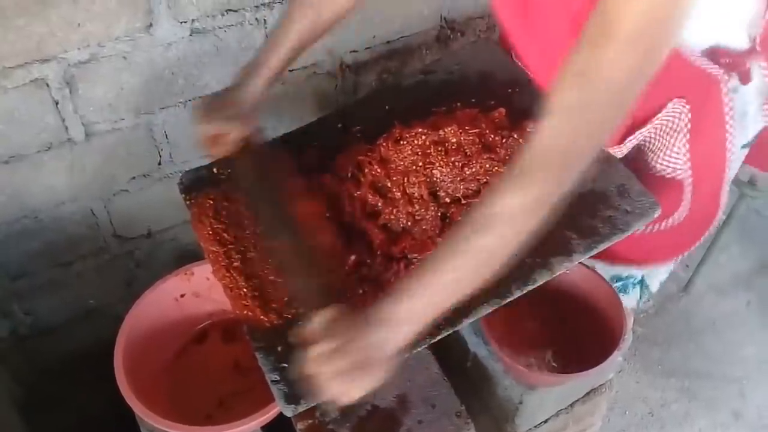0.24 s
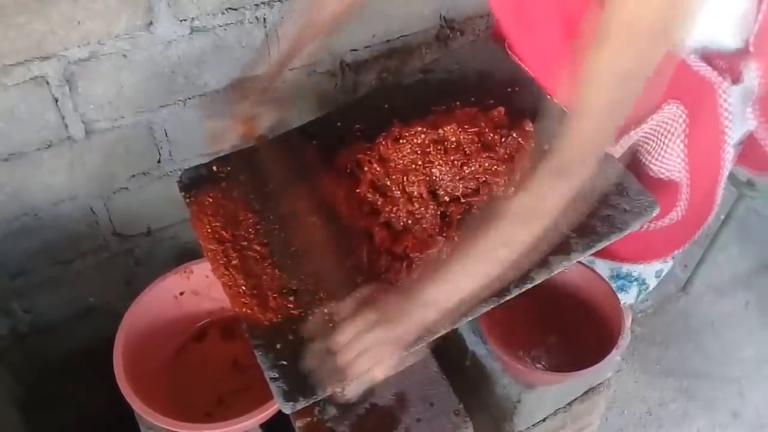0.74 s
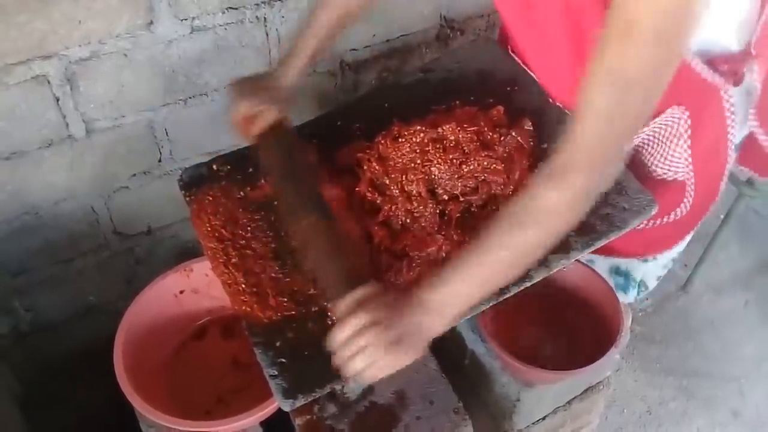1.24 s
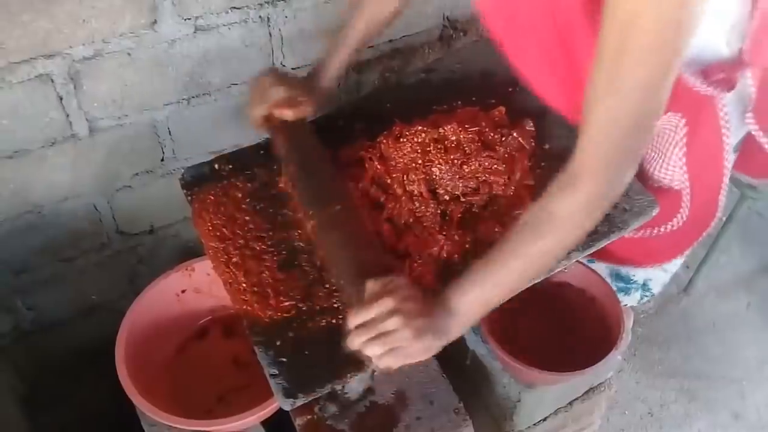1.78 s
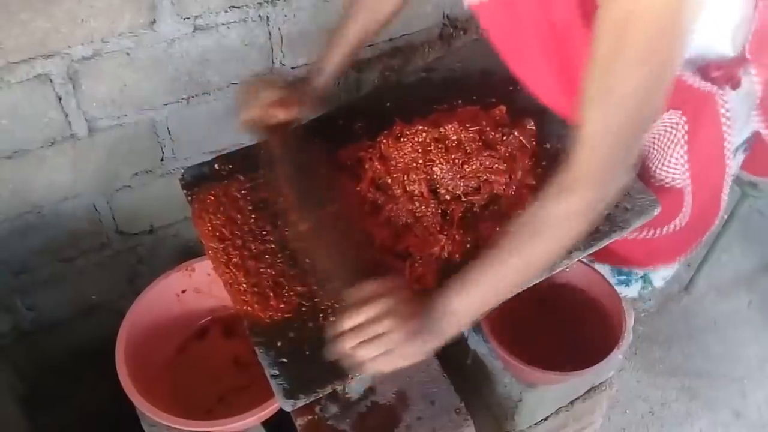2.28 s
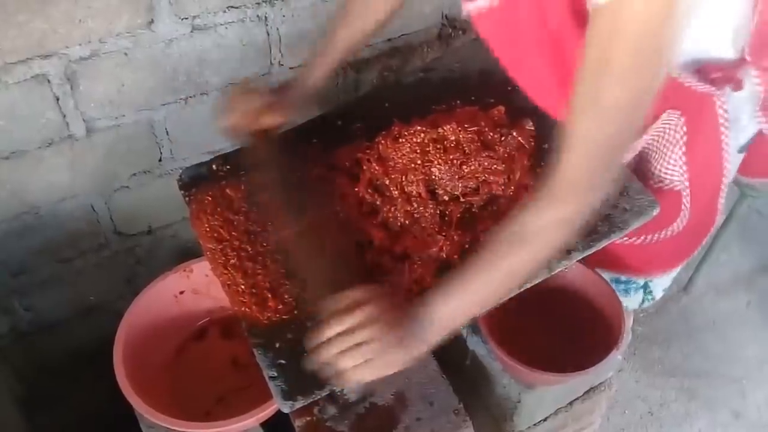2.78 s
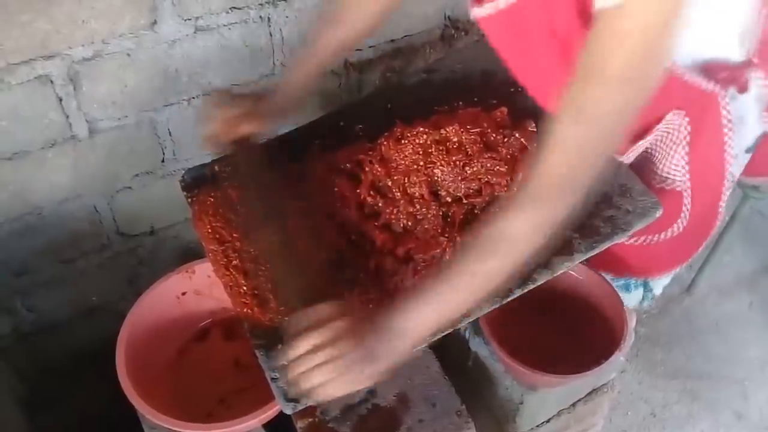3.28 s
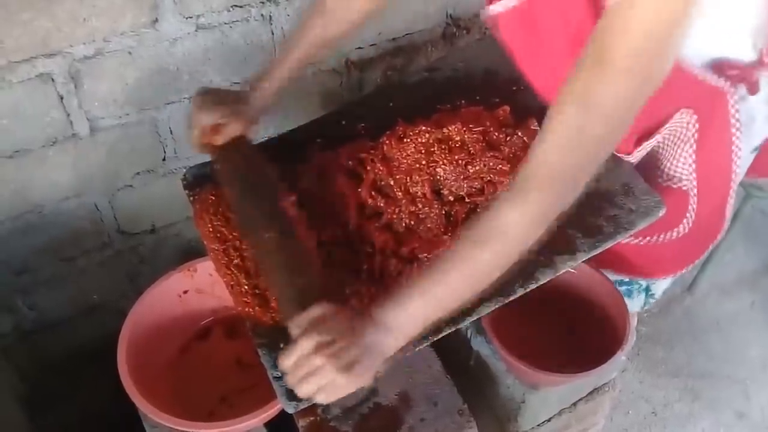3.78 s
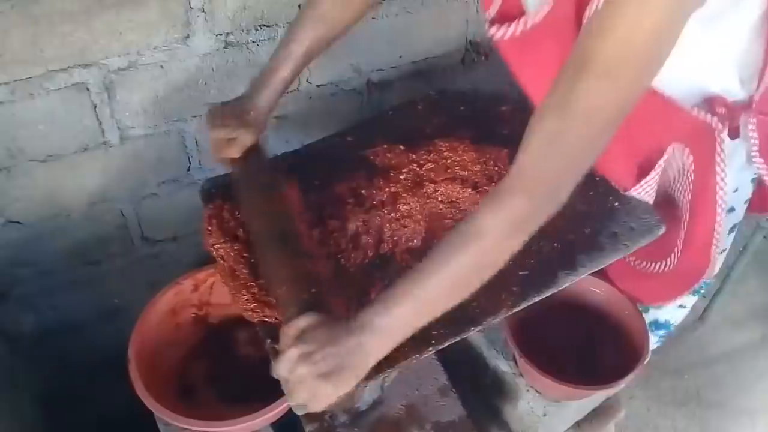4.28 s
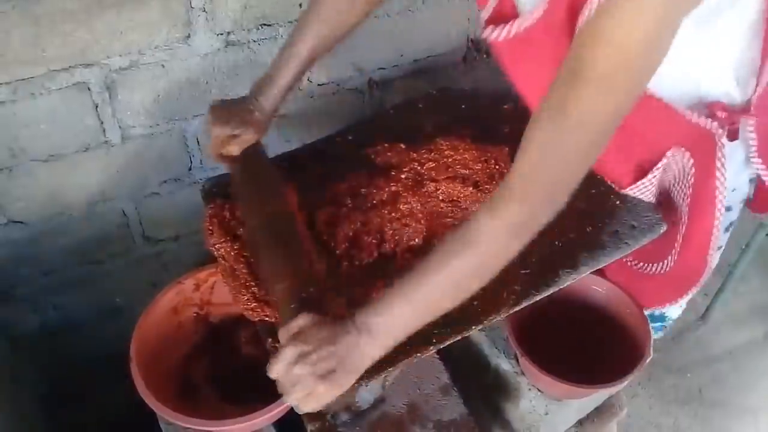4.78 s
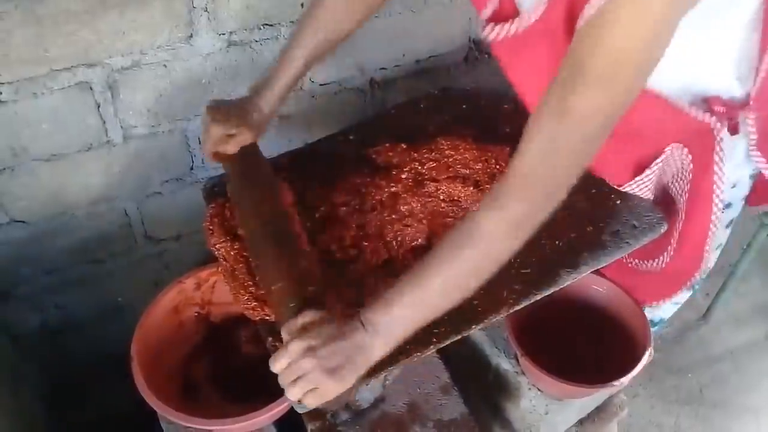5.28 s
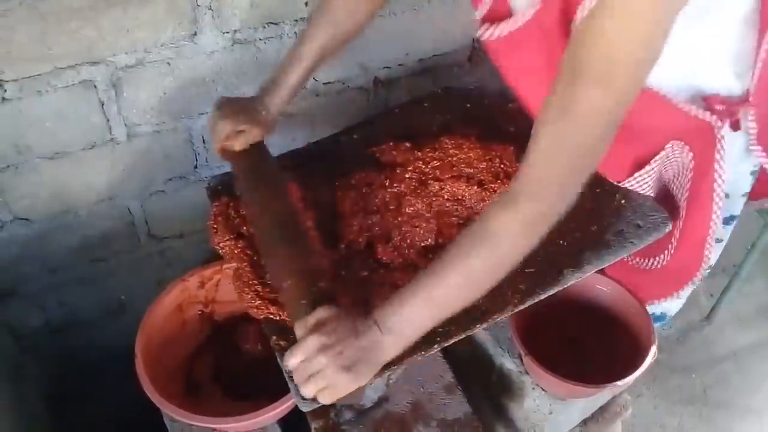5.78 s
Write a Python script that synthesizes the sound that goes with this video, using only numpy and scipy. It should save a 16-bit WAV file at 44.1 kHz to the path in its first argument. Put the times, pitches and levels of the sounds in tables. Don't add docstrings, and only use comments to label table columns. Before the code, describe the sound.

A stone roller scrapes quickly back and forth over a slab of wet chile paste, gritty and crunching, with low knocks and a distant engine hum.

```python
import sys
import numpy as np
from scipy import signal
from scipy.io import wavfile

SR = 44100
rng = np.random.default_rng(int(sys.argv[2]) if len(sys.argv) > 2 else 0)


def magnitude_from_level(level_db):
    exponent = np.asarray(level_db, float) / 20
    return 10 ** exponent


def int16_out(signal):
    q = np.round(np.clip(np.atleast_2d(signal).T, -1, 1) * 32767)
    wavfile.write(sys.argv[1], SR, q.astype(np.int16))


N = 266364
CUT_S = 4.363


def evened(x):
    return x / np.sqrt(np.mean(x ** 2) + 1e-20)


def curve(rows, column):
    rows = np.array(rows)
    return np.interp(np.arange(N) / SR, rows[:, 0], rows[:, column])


def colour(x, points):
    hz = abs(np.fft.fftfreq(8192, 1 / SR))
    f, db = np.transpose(points)
    gain_db = np.interp(np.log(hz + 1), np.log(f + 1), db, left=-70, right=-70)
    log_gain = np.log(magnitude_from_level(gain_db))
    taps = np.fft.ifft(np.exp(np.conj(signal.hilbert(log_gain)))).real[:4096]
    return signal.oaconvolve(x, taps)[:N]


def band(x, low_hz, high_hz):
    return signal.sosfilt(signal.butter(2, [low_hz, high_hz], "bandpass", fs=SR, output="sos"), x)


def resonate(x, hz, width):
    r = np.exp(-np.pi * width / SR)
    return signal.lfilter([1, 0, -1], [1, -2 * r * np.cos(2 * np.pi * hz / SR), r * r], x) * np.sqrt(1 - r)


def wander(per_s):
    steps = rng.standard_normal(N // 64 + 2)
    b, a = signal.butter(2, min(per_s * 128 / SR, .9))
    slow = 2 * np.tanh(evened(signal.lfilter(b, a, steps)) / 2)
    return np.interp(np.arange(N) / 64, np.arange(len(steps)), slow)


def grains(per_s, spread_db, smooth):
    chance, size, sign = rng.random(N), rng.exponential(1, N), rng.standard_normal(N)
    clicks = (chance < per_s / SR) * magnitude_from_level(spread_db * np.minimum(size, 4)) * np.sign(sign)
    return evened(clicks) + smooth * sign


def ring(x, modes, shift_db, per_s):
    return sum(magnitude_from_level(db) * resonate(x * magnitude_from_level(shift_db * wander(per_s)), hz, width) for hz, width, db in modes)


def struck(push, modes, low_hz, high_hz):
    push = band(push, low_hz, high_hz)
    sound = sum(magnitude_from_level(db) * resonate(push, hz, width + 45) for hz, width, db in modes)
    return sound / abs(sound).max()


def mottled(x, edges_hz, patchy_db, per_s):
    bands = zip(edges_hz, edges_hz[1:])
    return x + sum(band(x, low, high) * (magnitude_from_level(patchy_db * wander(per_s)) - 1) for low, high in bands)


def two_shots(x, first, second):
    return np.where(np.arange(N) < CUT_S * SR, evened(colour(x, first)), evened(colour(x, second)))


# frequency in Hz, level in dB.
ROOM_SPECTRUM = [(15, -28), (25, -5.5), (75, 4.5), (194, 3), (391, -12), (977, -16), (1150, -19),
                 (2510, -11.5), (3370, -19.5), (5190, -29), (7180, -45), (13700, -53), (15700, -44)]


def room_tone():
    level_db, swell_db = -46.5, 2.5
    return magnitude_from_level(level_db + swell_db * wander(2.9)) * evened(colour(rng.standard_normal(N), ROOM_SPECTRUM))


# pitch in Hz, width in Hz.
HUMS = [
    (77, 13),
    (104, 8.5),
    (135, 28.5),
]
# time in seconds, level in dB.
ENGINE_LEVEL = [
    (0.0, -65),
    (1.0, -55),
    (2.5, -53.5),
    (3.6, -53.5),
    (4.6, -47.5),
    (6.04, -48),
]


def drone():
    low, upper, stand = (evened(resonate(resonate(rng.standard_normal(N), *hum), *hum)) for hum in HUMS)
    upper_db, stand_db = -3.5, -12.5
    engine = magnitude_from_level(curve(ENGINE_LEVEL, 1)) * (low + magnitude_from_level(upper_db) * upper)
    return engine + magnitude_from_level(stand_db) * stroke(SLAB_LAYER) * stand


# middle in seconds, length in seconds, pitch in Hz, level in dB.
LOW_BOOMS = [(0.35, 0.21, 133.1, -37.5), (0.657, 0.076, 132, -28.5), (0.705, 0.048, 140, -38),
             (0.82, 0.17, 125, -36.5), (1.09, 0.16, 127.5, -41), (1.77, 0.16, 127.4, -43),
             (2.022, 0.18, 131.8, -37.5), (2.95, 0.18, 127, -37), (3.36, 0.17, 135.4, -47),
             (3.87, 0.13, 141, -34), (4.01, 0.11, 132.6, -44), (4.29, 0.18, 137, -34),
             (4.45, 0.17, 128.2, -37.5), (4.72, 0.18, 135.4, -46), (5.307, 0.12, 138.4, -43),
             (5.469, 0.117, 133.4, -35), (3.95, 0.33, 73.4, -39), (4.721, 0.18, 78.5, -34.5),
             (4.924, 0.17, 86, -43), (5.279, 0.29, 77.7, -38), (5.612, 0.12, 89.3, -37),
             (5.794, 0.15, 78, -38), (5.902, 0.4, 103.6, -30)]


def booming():
    out = np.zeros(N + SR)
    for s, length, hz, db in LOW_BOOMS:
        t = np.arange(round(length * SR)) / SR
        phase, sway = rng.uniform(0, 2 * np.pi, size=2)
        unsteady = 0.6 * np.sin(2 * np.pi * 7 * t + sway)
        tone = np.sin(2 * np.pi * hz * t + phase + unsteady)
        at = round((s - length / 2) * SR)
        out[at:at + len(t)] += magnitude_from_level(db + 1.0) * np.hanning(len(t)) * tone
    return out[:N]


# middle in seconds, length in seconds, pitch in
# Hz, level in dB.
SINGING_SLIPS = [(1.615, 0.037, 1780, -52), (1.643, 0.072, 1870, -48), (1.5, .025, 2280, -43),
                 (1.9, .05, 3080, -47), (1.708, .022, 2350, -42.5), (1.525, 0.09, 2300, -44.5),
                 (2.1, .04, 2900, -50), (3.643, 0.036, 2850, -38), (0.15, .06, 2480, -44),
                 (0.61, 0.076, 395, -35), (0.71, .045, 490, -42.5), (0.74, 0.03, 1200, -46),
                 (4.45, 0.049, 350, -29), (2.68, 0.022, 360, -28), (0.42, 0.0254, 370, -33),
                 (1.282, 0.0127, 357, -24), (1.4, 0.0296, 400, -37), (2.198, 0.0347, 281, -30),
                 (5.25, .024, 510, -27), (5.233, 0.0142, 446, -23.5), (3.556, 0.0302, 384, -29.5),
                 (3.825, 0.027, 400, -32), (0.1442, 0.052, 401, -40.5), (1.53, 0.04, 450, -42),
                 (5.3, 0.059, 258, -38), (2.93, .05, 1450, -39), (5.25, .08, 1500, -41), (3.1, .02, 394, -29),
                 (2.927, 0.0175, 356, -23), (5.82, .05, 390, -35), (5.32, 0.0255, 291, -28),
                 (5.27, .04, 265, -28), (4.241, .006, 2280, -26), (4.252, .012, 2700, -31),
                 (3.626, .008, 2600, -31.5), (3.665, .02, 3400, -44), (3.401, 0.0122, 476, -29),
                 (3.357, .008, 1500, -32), (1.62, .04, 2300, -47), (1.625, .04, 2800, -49),
                 (1.67, .04, 2500, -51), (3.64, .04, 2400, -44), (3.65, .04, 3300, -46), (0.7, .05, 560, -50),
                 (2.614, .01, 330, -29), (2.656, .02, 370, -28),
                 (0.356, 0.033, 2940, -41), (0.622, 0.069, 2600, -43), (0.645, 0.077, 2385, -43),
                 (0.81, 0.047, 259, -30), (0.829, 0.054, 1940, -45), (1.748, 0.056, 386, -29.5),
                 (2.197, 0.038, 1520, -43), (2.467, 0.053, 2476, -45), (2.641, 0.081, 1485, -38),
                 (2.644, 0.051, 2330, -40), (2.65, 0.051, 2476, -40.5), (2.89, 0.053, 2024, -44),
                 (2.948, 0.014, 450, -26), (2.894, 0.071, 2454, -47), (2.905, 0.064, 2433, -42),
                 (2.908, 0.079, 1507, -39), (3.097, 0.024, 390, -28), (3.352, 0.038, 2777, -42),
                 (3.355, 0.054, 1498, -43), (3.536, 0.035, 1500, -37), (3.556, 0.057, 2440, -46),
                 (3.79, 0.064, 2799, -49), (3.791, 0.072, 2067, -44), (3.795, 0.08, 2971, -48),
                 (3.82, 0.068, 1457, -37), (3.992, 0.042, 1358, -39), (4.021, 0.07, 1350, -38.5),
                 (4.04, 0.055, 279, -28), (4.241, 0.036, 1670, -44), (4.248, 0.037, 2770, -41),
                 (4.252, 0.049, 2368, -43), (4.445, 0.056, 2304, -41), (4.707, 0.074, 1520, -41),
                 (4.74, 0.071, 1780, -45), (4.747, 0.016, 447, -24), (4.963, 0.063, 256, -29),
                 (4.965, 0.045, 2580, -37.5), (5.221, 0.03, 401, -26.5), (5.266, 0.11, 2282, -43),
                 (5.471, 0.036, 820, -43), (5.478, 0.052, 2497, -39), (5.74, 0.064, 386, -27.5),
                 (5.76, 0.086, 1494, -44), (5.783, 0.066, 2454, -41), (5.786, 0.075, 1614, -37),
                 (5.793, 0.045, 2700, -44), (5.97, 0.014, 373, -29), (6.028, 0.025, 2131, -42),
                 (4.725, .012, 323, -24), (3.624, .014, 397, -27.5)]


def slips():
    out = np.zeros(N + SR)
    steady = 0.95
    for s, length, hz, db in SINGING_SLIPS:
        blur_hz = 9.8 + 0.048 * hz
        r = np.exp(-2 * np.pi * blur_hz / SR)
        rub = signal.lfilter([1], [1, -2 * r, r * r], rng.standard_normal((2, 6000)))[:, 1500:]
        t = np.arange(min(round(length * SR), 4400)) / SR
        tremble = steady + evened(rub[0, :len(t)]) + 1j * evened(rub[1, :len(t)])
        tone = evened((tremble * np.exp(2j * np.pi * hz * t)).real)
        swell = np.sin(np.pi * (t / length) ** 0.91) ** 1.28
        at = round((s - length / 2) * SR)
        out[at:at + len(t)] += magnitude_from_level(db) * tone * swell
    return out[:N]


# start in seconds, peak in dB, pitch in Hz.
SEEDS = [(0.294, -32, 5000), (0.3257, -27, 4130), (0.338, -20, 5260), (0.9632, -30, 4900),
         (1.1139, -31, 5260), (1.1817, -29, 4900), (1.303, -29, 4330), (1.548, -28, 4960),
         (1.7937, -33, 4660), (2.0129, -17.5, 4580), (2.173, -39, 5370), (2.4367, -26, 4980),
         (2.818, -17, 4040), (2.8853, -21, 4400), (2.8999, -26, 4430), (3.3422, -23, 5100),
         (3.6178, -24.5, 4930), (3.76, -25.5, 5240), (4.0565, -23, 4960), (4.1667, -21.5, 3960),
         (4.3305, -30, 4300), (4.382, -24, 5400), (5.0394, -26, 5400), (5.0672, -29, 4700),
         (5.238, -27, 4970), (5.3273, -32.5, 5800), (5.4226, -28, 4370), (5.5255, -30, 5400),
         (5.5354, -30, 4800), (5.965, -32, 5300)]
# start in seconds, peak in dB, pitch in Hz.
GRIT_CHIPS = [(1.235, -31, 1910), (2.09, -29, 2360), (2.6034, -36, 1520), (3.345, -20, 2720),
              (3.527, -33, 1510), (3.617, -26, 2700), (4.2383, -11.5, 1950), (4.682, -26, 2520),
              (4.8947, -46, 2500), (5.066, -28, 2550)]
# start in
# seconds, peak in dB, pitch in Hz.
MORE_SNAPS = [(0.5681, -35, 5150), (0.611, -32, 4620), (0.7677, -33, 4700), (0.824, -30, 5300),
              (0.8789, -33, 4270), (1.3588, -36, 4780), (1.4696, -39, 5160), (1.5214, -35, 5050),
              (1.726, -25, 4400), (1.876, -35, 3900), (2.0931, -33.5, 3930), (2.2712, -39, 5100),
              (2.3366, -31, 4400), (2.4239, -36, 4980), (2.9781, -31, 4240), (3.055, -30, 5290),
              (3.1477, -30, 4010), (3.626, -22, 4060), (3.7968, -30, 4430), (3.9504, -36, 5400),
              (4.9786, -27, 3970), (5.7423, -35, 4080), (0.5786, -29, 1160), (1.0291, -41, 2390),
              (1.6472, -34, 2230), (1.9709, -32, 1500), (2.4084, -35, 1140), (2.8594, -36, 2290),
              (3.1946, -24, 2470), (3.6676, -27, 1860), (3.7653, -21, 2030), (3.7843, -23, 2400),
              (3.8048, -22, 1480), (4.9077, -35, 2500), (5.038, -33, 1500), (5.7848, -25, 1620),
              (2.8182, -23, 4950), (3.633, -30, 3600), (3.645, -32, 4400)]
# start in seconds, peak in dB, pitch in Hz.
BRITTLE_FLAKES = [(0.767, -50, 9000), (0.9626, -46, 10000), (1.235, -51, 8000), (2.173, -42, 10000),
                  (2.818, -45, 10000), (3.147, -50, 8000), (3.19, -40, 7500), (3.5278, -50, 8000),
                  (3.617, -44, 8100), (3.856, -36, 11000), (4.135, -54, 9000), (4.237, -54, 8000),
                  (4.456, -48, 8000), (4.538, -41.5, 8000), (4.724, -44, 13000), (4.81, -46, 12000),
                  (4.8947, -46, 12000), (4.965, -44, 14000), (5.0394, -39, 13500), (5.0663, -42, 8000),
                  (5.5248, -48, 9000), (5.536, -31, 12500)]
# start in seconds, peak in dB, pitch in Hz.
FINE_FLAKES = [(0.181, -38, 13000), (0.619, -31, 7100), (0.9123, -40, 13700), (1.707, -48, 12400),
               (2.2109, -33, 14000), (3.1043, -43, 14300), (3.1747, -39, 10600), (3.6242, -41, 9000),
               (3.7973, -44, 7740), (4.2223, -47, 10100), (4.2572, -47, 12200), (4.3864, -38, 13300),
               (4.6843, -38, 14000), (5.7244, -40, 13400), (5.7703, -40, 13700), (5.9604, -40, 13600)]
SHELL_PITCHES = (4330, 4880)


def cracks(seeds, brittle):
    snaps, ticks, t = np.zeros(N + SR), np.zeros(N + SR), np.arange(900) / SR
    for s, db, hz in seeds:
        crumbs = rng.standard_normal(len(t))
        partner_hz = SHELL_PITCHES[int(hz < np.mean(SHELL_PITCHES))]
        is_grit = hz < 3300
        partner = (.45 - .3 * is_grit) * np.sin(2 * np.pi * partner_hz * t)
        pair = np.sin(2 * np.pi * hz * t) + partner
        rise = t / (.00055 if is_grit else .0009)
        tail = resonate(crumbs * np.exp(-t / 0.004), hz, 600)
        snap = (rise * np.exp(1 - rise)) ** 2 * pair + .25 * tail * np.minimum(rise, 1)
        at = round(s * SR)
        snaps[at:at + len(t)] += magnitude_from_level(db - 3) * snap
    seed_ticks = [(row[0], -60, 8000) for row in seeds]
    for s, db, hz in seed_ticks + brittle:
        burst = rng.standard_normal(len(t)) * np.exp(-t / 0.0012)
        at = round(s * SR)
        ticks[at:at + len(t)] += magnitude_from_level(db) * resonate(burst, hz, 4500)
    return snaps[:N] + band(ticks[:N], 5600, 16000)


# start in seconds, peak in dB, upper slab modes in dB,
# low roller ring in dB, high roller ring in dB.
LANDINGS = [(0.3463, -12, 0, -8.5, -39), (0.799, -22, -37, 2.5, -25), (1.062, -21.5, -5, -19, -5.5),
            (1.269, -14.5, -5, -0.5, -33), (1.73, -21, -25, 0, -19), (2.191, -21.5, -8, 2, -15),
            (2.605, -27, -6, -12, -18), (2.6196, -17, -6, -8, -15), (2.8734, -13, -4.5, -12, -11.5),
            (3.087, -18.5, -4, -4, -32), (3.1072, -15, 3, -12, -28), (3.249, -30.5, 1, -3, -15),
            (3.3333, -11.5, -3, -6, -37), (3.55, -20.5, -13, -18, -20), (3.592, -14.5, -9.5, -30, -20),
            (3.976, -23.5, -13, -1, -26), (4.423, -15.5, -6, -16, -16.5), (4.679, -16, -6, -6, -10),
            (4.944, -28, 1, -6, -8), (5.2031, -13.5, -9, -6, -29), (5.4623, -12.5, -0.5, -12, -9),
            (5.717, -21, -1, -5, -37), (5.9792, -11, 1, -16, -40)]
# pitch in Hz, level in dB, swell in seconds.
THUD_MODES = [
    (262, -8, .005),
    (388, -4, .006),
    (480, -3, .002),
    (580, -9, .002),
]
# pitch in Hz, width in Hz, level in dB.
SLAB_LOW = [(237, 22, -16), (270.1, 33, -3.5), (329.5, 21, -7.5), (379.2, 21, -2), (404.5, 6.7, -15.5)]
# pitch in Hz, width in Hz, level in dB.
SLAB_HIGH = [(480, 14, -11.5), (582, 30, -15.5), (659, 13, -12.5), (820, 42, -14), (837, 23, -44)]
# pitch in Hz, width in Hz, level in dB.
ROLLER_LOW = [(1163, 106, -3.5), (1353, 110, -6.5), (1500, 93, -3.5), (1642, 11, -14), (1790, 110, -9)]
# pitch in Hz, width in Hz, level in dB.
ROLLER_HIGH = [(2286, 57, -9), (2449, 91, -2.5), (2668, 62, -3), (2800, 110, -12)]


def knocks():
    out, t = np.zeros(N + SR), np.arange(3000) / SR
    thud = np.zeros(len(t))
    for hz, db, swell in THUD_MODES:
        thud += magnitude_from_level(db) * np.sin(2 * np.pi * hz * t) * t / swell * np.exp(1 - t / swell)
    thud *= np.exp(-(t / .017) ** 8)
    rebound = 0.3
    bounce = np.exp(-((t - .033) / .008) ** 4)
    thud += rebound * np.sin(2 * np.pi * THUD_MODES[1][0] * t) * bounce
    partner_s = .004
    partner = np.sin(2 * np.pi * 740 * t) * (t / partner_s * np.exp(1 - t / partner_s)) ** 2
    for s, db, upper_db, ring_db, high_db in LANDINGS:
        rough = rng.standard_normal(len(t))
        later = t - .027
        push = 3.0 * np.exp(-t / .0003) + rough * np.exp(-(t / .012) ** 4)
        push += rebound * (later > 0) * rough * np.exp(-(later / 0.0074) ** 2)
        chatter = struck(push, SLAB_LOW, 130, 480) + magnitude_from_level(upper_db) * struck(push, SLAB_HIGH, 455, 750)
        sound = thud + magnitude_from_level(upper_db - 10.0) * partner + magnitude_from_level(-9) * chatter
        sound += magnitude_from_level(ring_db - 5.0) * struck(push, ROLLER_LOW, 1230, 1730)
        sound += magnitude_from_level(high_db) * struck(push, ROLLER_HIGH, 2290, 2620)
        at = round(s * SR)
        out[at:at + len(t)] += magnitude_from_level(db - 3.0) * sound
    return out[:N]


def contact():
    airborne_s, loss = .026, .5
    out, t = np.ones(N + SR), np.arange(round(airborne_s * SR)) / SR
    for row in LANDINGS:
        at = round(row[0] * SR)
        out[at:at + len(t)] *= 1 - loss * np.sqrt(np.sin(np.pi * t / airborne_s))
    return out[:N]


# fastest at seconds, speeding up in seconds, slowing down in seconds,
# pressure in dB, rasp in dB.
PUSH_STROKES = [(0.164, 0.11, 0.13, -37.5, -40), (0.621, 0.1, 0.12, -35.5, -36),
                (1.077, 0.074, 0.16, -33.5, -38), (1.549, 0.1, 0.12, -34.5, -38),
                (2.005, 0.092, 0.17, -34, -38.5), (2.458, 0.096, 0.13, -29, -39.5),
                (2.909, 0.092, 0.19, -30.5, -37), (3.357, 0.06, 0.15, -26.5, -37),
                (3.817, 0.1, 0.14, -31, -38), (4.263, 0.12, 0.14, -34, -35.5),
                (4.713, 0.11, 0.14, -26.5, -42), (5.239, 0.075, 0.17, -24.5, -41.5),
                (5.764, 0.11, 0.17, -26, -41)]
PULL_STROKES = [(-0.055, 0.021, 0.1, -28, -36), (0.347, 0.074, 0.19, -30, -41),
                (0.804, 0.084, 0.2, -32, -40.5), (1.277, 0.073, 0.2, -33.5, -42.5),
                (1.735, 0.071, 0.18, -31.5, -42), (2.191, 0.073, 0.23, -34.5, -41.5),
                (2.635, 0.053, 0.22, -28, -45), (3.105, 0.093, 0.28, -29, -43.5),
                (3.579, 0.12, 0.21, -30, -43), (4.007, 0.078, 0.22, -27.5, -42),
                (4.418, 0.065, 0.18, -29.5, -44), (4.956, 0.11, 0.16, -31.5, -45),
                (5.473, 0.095, 0.18, -31.5, -44), (5.989, 0.074, 0.33, -28, -44.5)]
# offset in dB, lag in seconds, head start in seconds.
PUSH_TO_LAYER = [
    (1, 0.0057, 0.001),
    (-0.37, 0.00068, 0.002),
    (-3.5, -0.0067, 0.0021),
    (-12.5, 0.016, 0.0055),
]
# offset in dB, lag in seconds, head start in seconds.
PULL_TO_LAYER = [
    (-2, -0.00019, 0.001),
    (-3, 0.00076, 0.0025),
    (1, 0.00047, 0.0086),
    (-6.5, -0.0052, 0.0065),
]
# share of pressure against rasp from 0 to 1, power of speed, level at rest in dB,
# step in dB once the scene changes.
LAYER_RESPONSE = [
    (0.98, 2.52, -53.5, 0.9),
    (0.5, 1.89, -61.5, 0.3),
    (0.05, 1.78, -60, -0.4),
    (0.1, 2.02, -64.5, 4),
]
SLAB_LAYER, ROLLER_LAYER, CRUNCH_LAYER, HISS_LAYER = range(4)


def stroke(layer):
    share, power, rest_db, step_db = LAYER_RESPONSE[layer]
    t, out = np.arange(N) / SR, np.zeros(N)
    for rows, feed, roundness in ((PUSH_STROKES, PUSH_TO_LAYER, 1.16), (PULL_STROKES, PULL_TO_LAYER, 1)):
        feed_db, lag, early = feed[layer]
        for s, rise, fall, pressure_db, rasp_db in rows:
            rise = rise + early
            near = slice(max(round((s + lag - rise) * SR), 0), round((s + lag + fall) * SR))
            since = t[near] - s - lag
            away = np.where(since < 0, -since / rise, since / fall)
            speed = np.clip(1 - away ** roundness, 0, 1)
            db = share * pressure_db + (1 - share) * rasp_db + feed_db + step_db * (s > CUT_S)
            out[near] += magnitude_from_level(db) * speed ** power
    return out + magnitude_from_level(rest_db + .5 * step_db * (t > CUT_S))


def shaken_slab(judder):
    load = np.minimum(stroke(SLAB_LAYER), magnitude_from_level(-27.5))
    bumps = band(grains(500, 2.2, smooth=.8) * magnitude_from_level(1.5 * judder), 150, 950)
    lower = ring(bumps, SLAB_LOW, shift_db=1.0, per_s=3.8)
    upper = ring(bumps, SLAB_HIGH, shift_db=3.5, per_s=4.2)
    return contact() * load * evened(lower + (load / magnitude_from_level(-25.0)) ** 0.39 * upper)


# frequency in Hz, level in dB.
GRIT_SPECTRUM = [(290, -14), (500, 8.5), (992, -7.5), (1490, -30.5), (1920, -4), (2460, 6.5), (3600, -18),
                 (4680, -35.5), (7920, -120)]


def gritty_roller(judder, flicker):
    grit = band(grains(700, 3.5, smooth=.6) * magnitude_from_level(1.5 * judder + .5 * flicker), 534, 5500)
    ringing = ring(grit, ROLLER_LOW + ROLLER_HIGH, shift_db=3.5, per_s=6.3)
    scrape = evened(colour(grit, GRIT_SPECTRUM))
    return stroke(ROLLER_LAYER) * evened(evened(ringing) + 0.71 * scrape)


def flakes(effort):
    out, t = np.zeros(N), np.arange(300) / SR
    for hz in np.geomspace(2800, 7000, num=11):
        train = grains(70, 1.3, smooth=0) * effort
        grain = t * np.exp(-t / 0.00063) * np.sin(2 * np.pi * hz * t)
        out += signal.oaconvolve(train, grain)[:N]
    return evened(out)


# frequency in Hz, level in dB.
CRUNCH_BEFORE = [(1760, -24), (3000, -6.5), (3390, -13), (3890, -4), (5140, 0.5), (5460, -1), (6680, -22),
                 (8000, -16.5), (10400, -45), (17600, -120)]
# frequency in Hz, level in dB.
CRUNCH_AFTER = [(1760, -51), (3000, -3), (3440, -11.5), (4010, -1), (5930, -1.5), (6570, -7), (7100, -11),
                (8000, -9), (10400, -29), (17600, -120)]


def crunching(judder, flicker, clump):
    rub = mottled(rng.standard_normal(N), np.linspace(3000, 7000, num=5), patchy_db=2.0, per_s=29)
    crunch = evened(rub * magnitude_from_level(1.6 * judder + 1.5 * flicker)) + .65 * flakes(magnitude_from_level(4 * clump))
    return stroke(CRUNCH_LAYER) * two_shots(crunch, CRUNCH_BEFORE, CRUNCH_AFTER)


# frequency in Hz, level in dB.
HISS_BEFORE = [(3820, 6.5), (6500, 3), (7210, -4), (8960, -0.5), (12200, 0.5), (14400, 0), (15700, -5)]
# frequency in Hz, level in dB.
HISS_AFTER = [(3820, -6), (6500, -5), (7180, -15), (9710, -7.5), (11100, -12), (13800, -5), (15700, -15)]


def fine_hiss(flicker, clump):
    hiss = grains(600, 4.8, smooth=4.8) * magnitude_from_level(0.92 * clump + 2.0 * flicker)
    hiss = mottled(hiss, np.linspace(7000, 16000, num=4), patchy_db=2.0, per_s=14)
    return stroke(HISS_LAYER) * two_shots(hiss, HISS_BEFORE, HISS_AFTER)


def grinding():
    judder, flicker, clump = wander(42.0), wander(100), wander(18)
    stones = shaken_slab(judder) + gritty_roller(judder, flicker)
    return stones + crunching(judder, flicker, clump) + fine_hiss(flicker, clump)


def walls(x):
    t = np.arange(8000) / SR
    sparse = rng.standard_normal(len(t)) * (rng.random(len(t)) < .05)
    tail = sparse * magnitude_from_level(-60 * t / 0.11) * (t > .003)
    return signal.oaconvolve(x, tail / np.linalg.norm(tail))[:N]


def scene():
    steady = room_tone() + drone() + booming() + grinding()
    rings, thumps = slips(), knocks()
    snaps = cracks(SEEDS + GRIT_CHIPS, BRITTLE_FLAKES) + cracks(MORE_SNAPS, FINE_FLAKES)
    echo = walls(magnitude_from_level(-13) * thumps + magnitude_from_level(-11) * snaps + magnitude_from_level(-10) * rings)
    return (steady + rings + thumps + snaps + echo)[None]


def top_cut(x):
    return signal.sosfilt(signal.butter(12, 15830, fs=SR, output="sos"), x)


def record(dry):
    fade = np.clip(abs(np.arange(N) / SR - CUT_S) / .006, .12, 1)
    edge = signal.firwin(511, 15780, window=("kaiser", 9), fs=SR)
    mix = signal.oaconvolve(dry * fade, edge[None], "same")
    return top_cut(mix)


dry = scene()
out = record(dry)
int16_out(out)
```